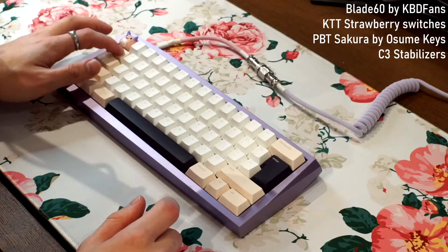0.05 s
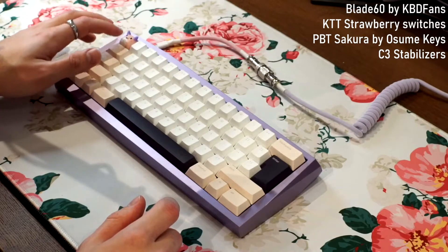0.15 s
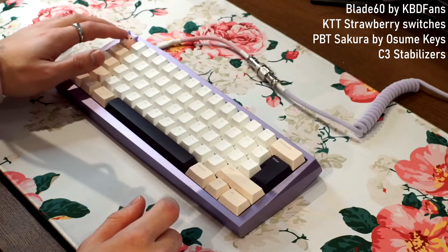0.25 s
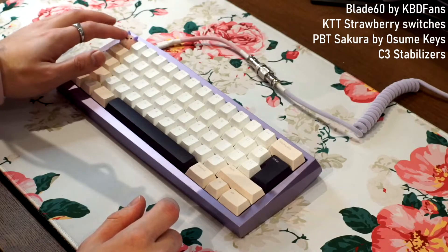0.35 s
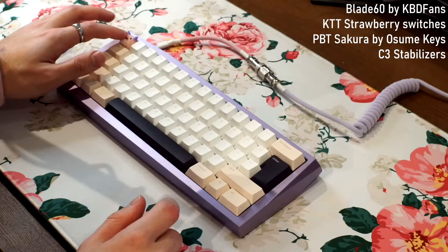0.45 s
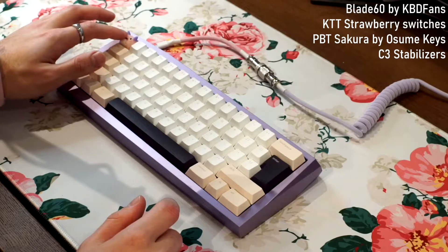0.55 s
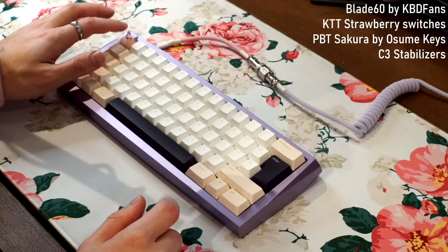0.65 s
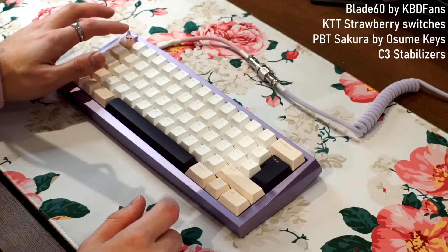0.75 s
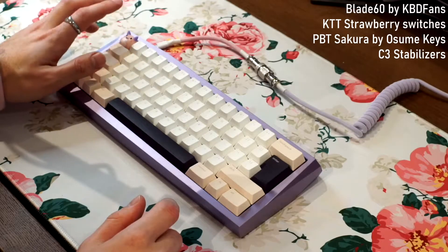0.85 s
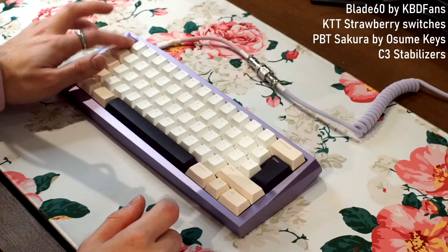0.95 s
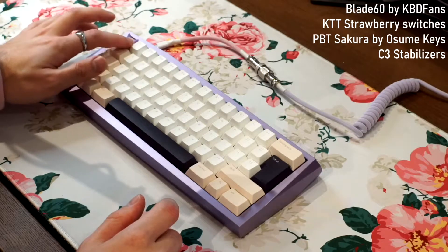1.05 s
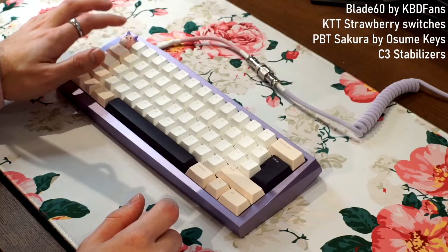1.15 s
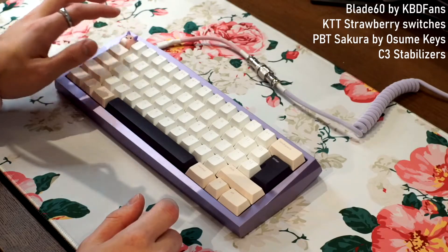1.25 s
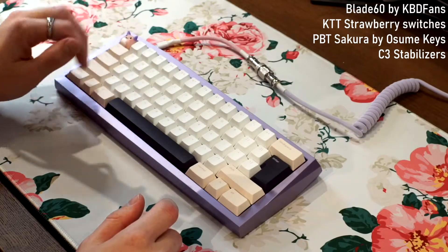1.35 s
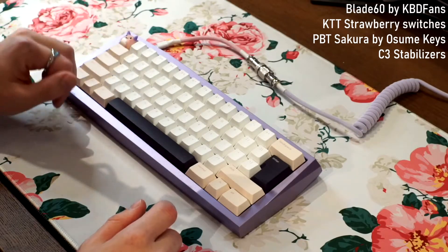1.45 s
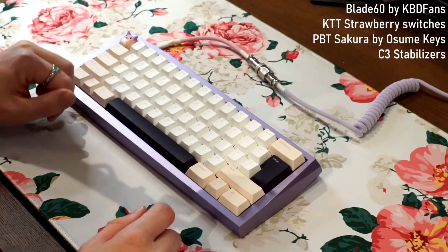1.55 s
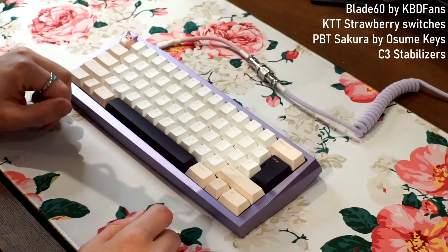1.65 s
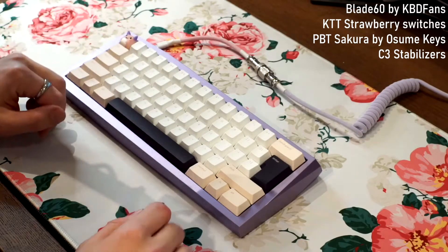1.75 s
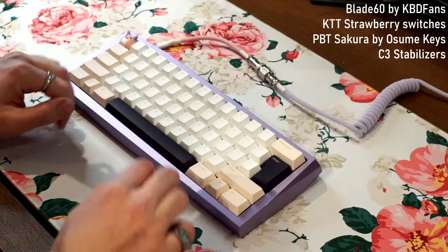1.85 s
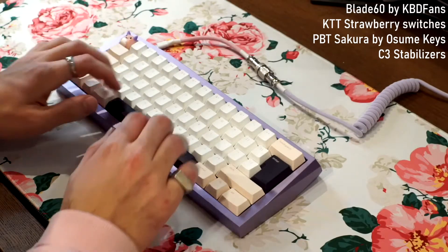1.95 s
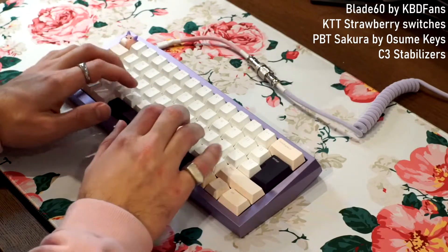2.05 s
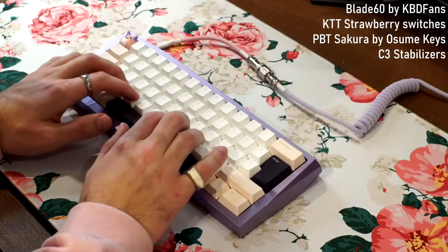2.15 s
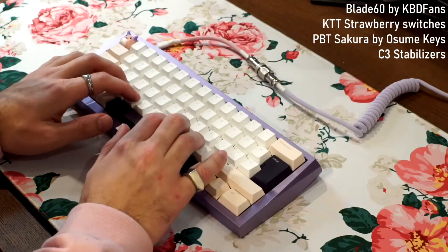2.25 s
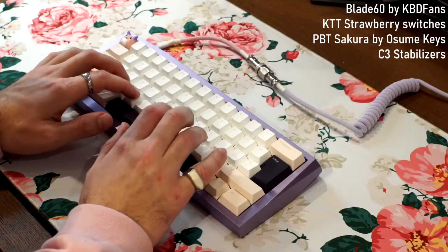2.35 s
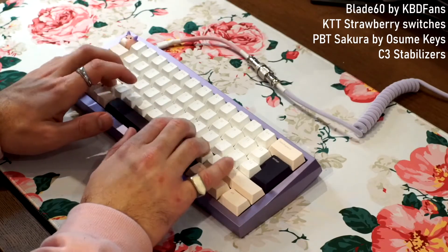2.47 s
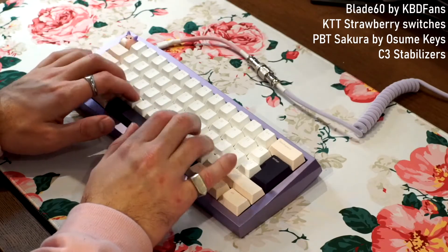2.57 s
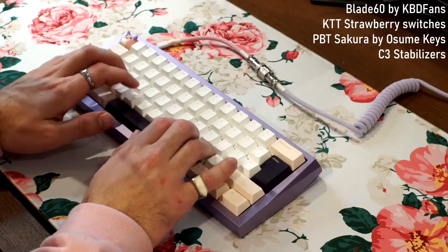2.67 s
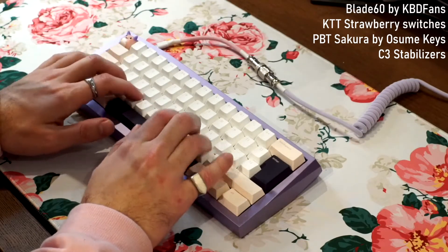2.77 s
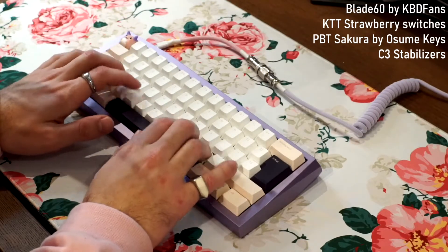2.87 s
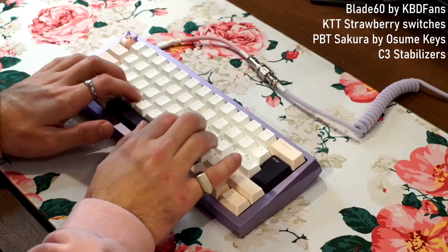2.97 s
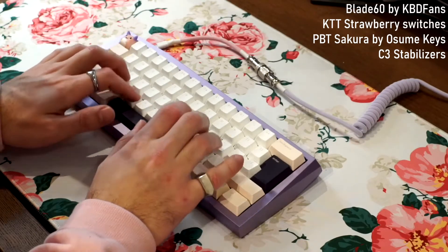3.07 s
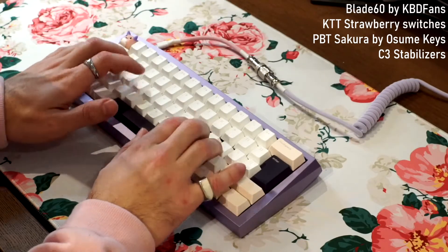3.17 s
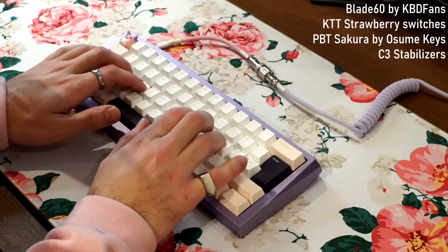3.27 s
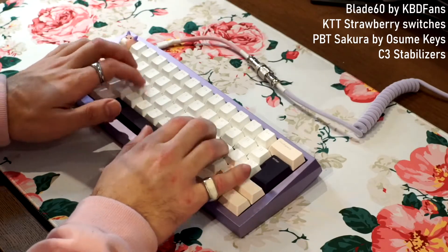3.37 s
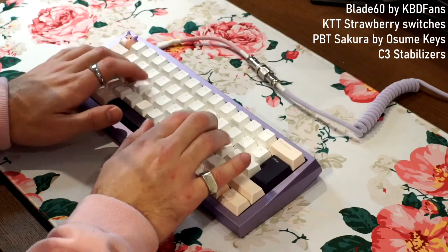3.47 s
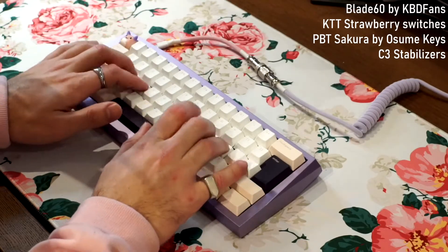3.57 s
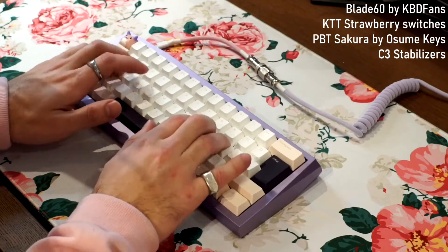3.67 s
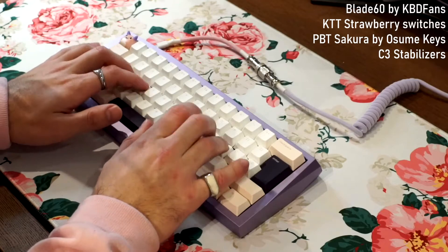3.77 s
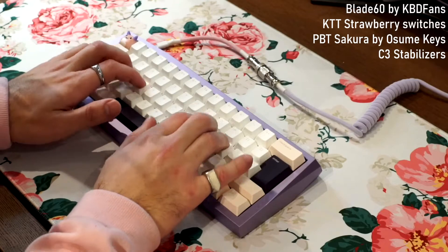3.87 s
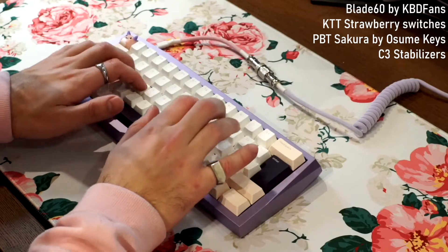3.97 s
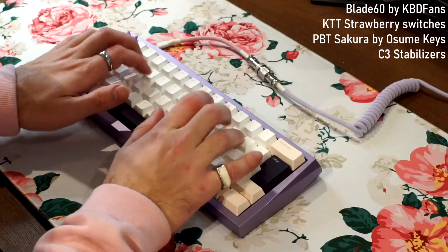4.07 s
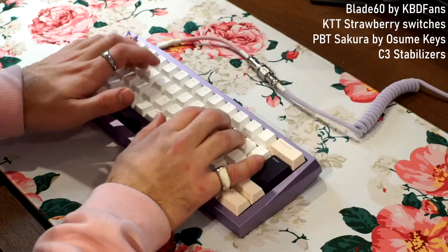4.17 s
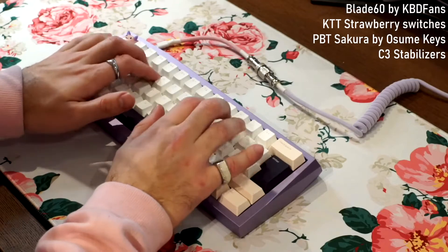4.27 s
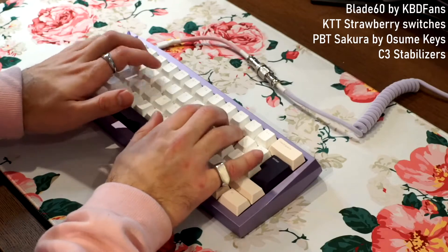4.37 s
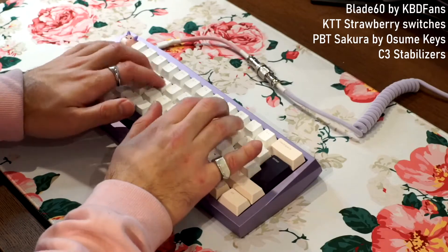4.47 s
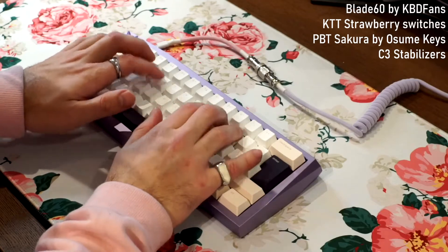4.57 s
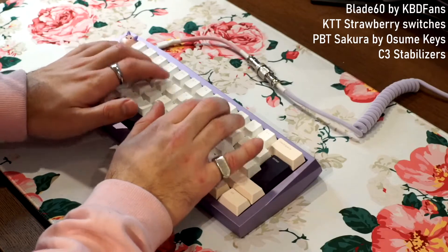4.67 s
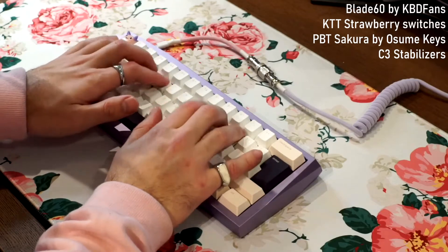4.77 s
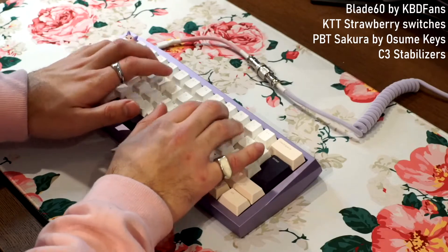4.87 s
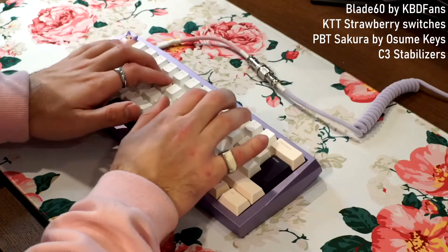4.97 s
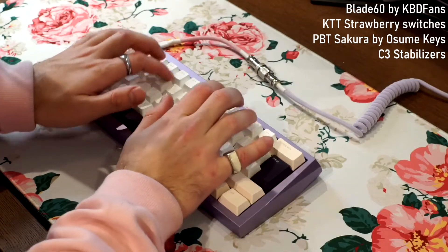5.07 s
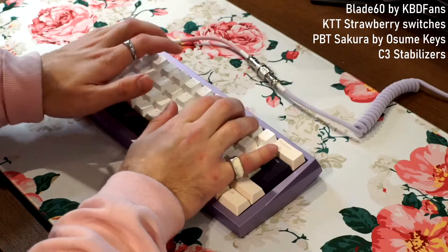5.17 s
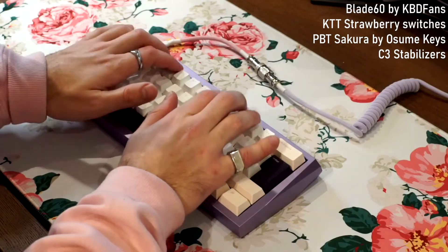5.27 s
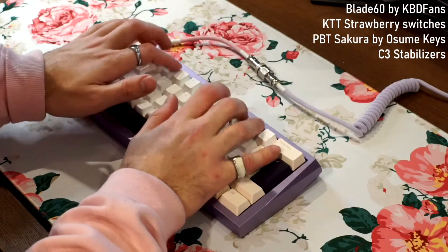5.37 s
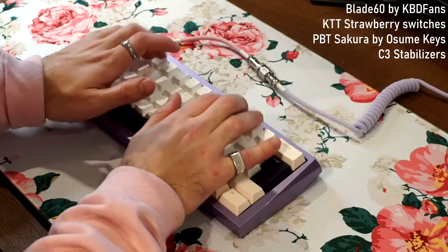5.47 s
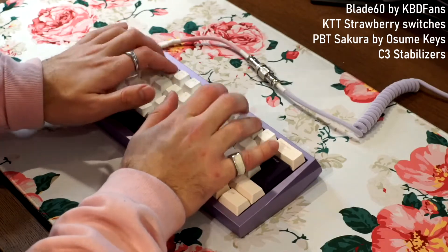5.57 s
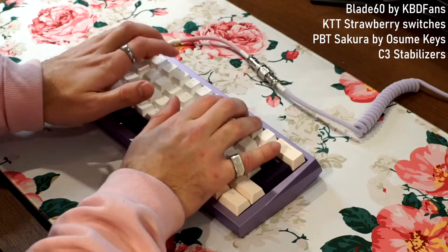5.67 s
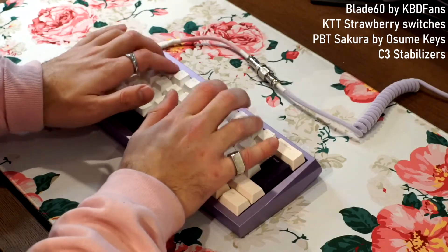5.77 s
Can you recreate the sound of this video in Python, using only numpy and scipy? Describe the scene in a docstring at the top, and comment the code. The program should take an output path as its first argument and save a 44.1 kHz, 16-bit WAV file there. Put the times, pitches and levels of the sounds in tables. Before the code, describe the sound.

Two single deep key presses on a mechanical keyboard, a pause with faint cloth rustle, then fast, dense bursts of clacking typing in a quiet room.

```python
"""Fingers type on a small mechanical keyboard on a cloth desk mat: two single presses, then fast bursts.
Each contact sums damped modes of cap, stem and metal case, with a short noise swelling and fading around it.
Desk and ceiling throw the clacks back and forth; the room adds diffuse tails and steady noise.
Skin and a sleeve brush the mat as grainy noise; a very low hum and a rocking microphone stand are slow sines."""
import sys
import numpy as np
from scipy import signal
from scipy.fft import rfft, irfft, next_fast_len
from scipy.io import wavfile
from scipy.ndimage import uniform_filter1d

SR = 44100
rng = np.random.default_rng(int(sys.argv[2]) if len(sys.argv) > 2 else 0)


def digitize_waveform(pressure):
    """Quantize a signal to 16-bit integers and store it at the path in sys.argv[1].

    Rows of a 2-D input are taken as channels; values are limited to [-1, 1].
    """
    field = np.atleast_2d(pressure).T
    bounded = np.clip(field, -1, 1)
    quanta = np.round(bounded * 32767).astype(np.int16)
    wavfile.write(sys.argv[1], SR, quanta)


def ratio_of_db(decibels):
    """Turn decibels (scalar or array-like) into linear amplitude factors; 0 dB maps to 1."""
    return 10 ** (np.asarray(decibels, float) / 20)


N = 256662


def along(points, hz):
    """Linear interpolation of (f/Hz, value) points on a logarithmic frequency axis."""
    f, v = np.transpose(points)
    return np.interp(np.log(hz + 1), np.log(f + 1), v)


def filtered(x, response):
    """Linear filtering: the spectrum of x times a complex response of frequency."""
    m = next_fast_len(N + SR // 2)
    spectrum = rfft(x, m)
    return irfft(spectrum * response(np.fft.rfftfreq(m, 1 / SR)), m)[..., :N]


def ring(hz, gain, t60, attack, size):
    """Modal superposition: exponentially damped sines, each row summed to one sound of energy 1."""
    t = np.arange(size) / SR
    hz, gain, t60 = (np.asarray(v)[..., None] for v in (hz, gain, t60))
    modes = gain * ratio_of_db(-60 * t / t60) * np.sin(2 * np.pi * hz * t)
    x = modes.sum(-2) * (1 - np.exp(-t / attack))
    return x / np.linalg.norm(x, axis=-1, keepdims=True)


def place(s, db, sounds):
    """Superposition in time: each row laid down at its time and level, some just before the start."""
    at = np.round((s + 1) * SR).astype(int)[:, None] + np.arange(sounds.shape[-1])
    scaled = ratio_of_db(db)[:, None] * sounds
    return np.bincount(at.ravel(), scaled.ravel(), N + 3 * SR)[SR:SR + N]


def struck(modes, scatter_db, detune, attack, size, count, lean_db=0):
    """Modal excitation: each blow drives one set of modes at new strengths, signs and slight detunings."""
    hz, db, t60 = np.transpose(modes)
    chance = rng.standard_normal((count, 3, len(hz)))
    sign = np.sign(chance[:, 2])
    gain = sign * ratio_of_db(db + lean_db + scatter_db * chance[:, 1])
    return ring(hz * (1 + detune * chance[:, 0]), gain, t60, attack, size)


def contacts():
    """Random point process: each clear contact is followed by one faint, randomly timed and pitched tap."""
    # clear contacts of a key stem: t/s, clack level/dB, clack f/Hz,
    # then case ring level/dB and stem level/dB against the clack
    clear = [(-.015,-34.5,1930,15,0),(0.0529,-29.5,2055,19.5,5),(0.5752,-69,1520,18,-9),(0.9232,-22,2500,14,15),(0.9236,0.5,1644,4,-8),(1.0643,-32.5,2700,11,5),
             (2.214,-55,2200,-6,-11),(2.284,-44.5,1690,5.5,-16.5),(2.378,-46.5,2360,-5,1.5),(2.3942,-20.5,2520,-2.5,-5.5),(2.411,-20,2540,-5,-3),
             (2.4334,-15,2040,-8.5,-12),(2.463,-30.5,2280,-5,-5),(2.4981,-12.5,1990,-13,-8.5),(2.5011,-12.5,2500,-5,-4.5),(2.5059,-27,1910,-5,-21),
             (2.5258,-21.5,2080,-6,-11),(2.5301,-9,2500,-11.5,0),(2.5694,-18,2010,-10,-12),(2.5757,-17.5,2370,-9,-9),(2.594,-23.5,2600,1,2),
             (2.6044,-14,2400,-11,-5),(2.6251,-24,2250,-2,1.5),(2.6434,-19.5,2260,-5,0),(2.6682,-17.5,1960,-13,-14),(2.6849,-21,2200,-4.5,-12),
             (2.6949,-14.5,2420,-9,-9),(2.7173,-16,2260,-8,-6.5),(2.73,-16.5,2110,-7,-5),(2.7949,-19.5,2370,-4.5,-4.5),(2.8094,-23,2050,-27,-13),
             (2.8186,-17,2440,-8.5,-7),(2.8293,-20.5,1920,-10,-3),(2.8452,-12.5,2660,-9.5,-1.5),(2.9107,-16,2000,-9,-14),(2.9242,-19.5,2230,0.5,-3.5),
             (2.9279,-18.5,2370,-2,-11),(2.9446,-13.5,2730,-13,-4.5),(2.9581,-20.5,2230,-6,-7.5),(3.0162,-31.5,1960,-18,-24),(3.022,-28,1950,2.5,-5),
             (3.087,-20.5,2600,-7,-2),(3.1002,-31.5,2780,-7,-1),(3.1246,-29,1910,-10,1.5),(3.1621,-37.5,2320,4,7.5),(3.19,-26,2130,-19,-15),
             (3.1924,-30,2000,-10,-25),(3.2052,-16,2270,-8,-5.5),(3.212,-8.5,2280,-24,0),(3.2306,-18,2430,-26,-8),(3.2441,-6,2380,-33,-4.5),
             (3.3007,-31,2350,-1,-13),(3.306,-22.5,2530,1.5,-4),(3.329,-16.5,2600,-8,-6),(3.3371,-18.5,2420,-31,-12),(3.351,-11,2430,-36,-3.5),
             (3.3556,-7.5,2300,-19,-1.5),(3.4072,-16.5,2070,-10,-7.5),(3.4226,-19.5,2610,-6,-14),(3.4256,-23,2150,-25,-6),(3.4445,-10,2670,-12,0.5),
             (3.45,-12,2070,-20,-5.5),(3.488,-6.5,2040,-19,-2),(3.5208,-13,2630,-4,-6),(3.5422,-19,2300,1.5,-1),(3.5476,-22.5,2800,-8,-16),
             (3.584,-5,2300,-26,-2.5),(3.6304,-17,2330,-22,-6.5),(3.6334,-23,1800,-13,-13),(3.6389,-21,2800,-10,-15),(3.648,-21,2430,-13,-13),
             (3.6619,-34,1950,-14,9),(3.671,-11,2300,-7,0.5),(3.6736,-14,2810,-19,-10),(3.7303,-13,2330,-25,-5),(3.739,-18,2740,-4,-7),
             (3.7576,-21,1980,0.5,-14),(3.7681,-19,2620,-6,-4),(3.774,-34,2530,-6,-8),(3.7861,-7,2380,-19,-2),(3.8043,-29,2260,-6,-5),
             (3.8467,-11.5,2110,-9.5,-8),(3.8505,-21,1850,-9,-26),(3.882,-11,2510,-15,-16),(3.8862,-15.5,2370,-21,-3.5),(3.9527,-23,2280,2.5,-4.5),
             (3.9578,-25,2630,-20,-11),(3.96,-24,1850,-7,-19),(4.0042,-23,2380,-11,-1),(4.0421,-31,1870,-1,-2),(4.0634,-32,2260,-16,6),
             (4.077,-15.5,2550,-25,-8),(4.0782,-13.5,2330,-20,-9),(4.0929,-5.5,2500,-18,-1.5),(4.148,-31,2260,-2,2),(4.1575,-6,2440,-23,-8.5),
             (4.1704,-19.5,2240,-2,-25),(4.1819,-6,2580,-20,-5),(4.2062,-19.5,2530,-19,-6),(4.2325,-17.5,2430,-5,-7),(4.236,-24,1860,-14,-15),
             (4.2423,-17,2340,-11,-7),(4.2796,-36,2600,-2,-4),(4.2888,-20.5,2640,-7,-3),(4.2943,-19.5,2460,-20,-16),(4.3003,-7.5,2430,-30,-7),
             (4.3203,-8,2400,-29,-3),(4.3819,-20.5,2500,-8,-8),(4.391,-17.5,2470,-15,-7),(4.4063,-11.5,2710,-15,-7.5),(4.408,-21,2740,-2,-13),
             (4.4244,-6,2550,-22,-1.5),(4.4632,-37,2350,6,-11),(4.4784,-12,2630,-19,-8.5),(4.499,-19.5,2460,-9,-7),(4.5175,-13.5,2620,-27,-10),
             (4.5321,-19,2640,-13,-4),(4.5553,-13,2700,-30,-7),(4.599,-10.5,2670,-24,-11),(4.6035,-12,2480,-29,-12),(4.608,-15,2460,-10,-9),
             (4.629,-6.5,2260,-15,-1.5),(4.638,-17,2550,-8,-9),(4.655,-51,2480,-2,17),(4.6618,-5.5,2530,-18,-3),(4.706,-35,2620,2,5),
             (4.7175,-13,2360,-23,-7.5),(4.727,-9,2480,-27,-6.5),(4.7313,-12,2460,-34,-14),(4.7637,-13,2700,-38,-6.5),(4.7711,-20,2670,-12,-4),
             (4.8341,-19,2370,-6,-7.5),(4.8428,-23.5,2400,-1.5,-4.5),(4.868,-23,2650,-27,-12),(4.881,-19,2550,-20,-10.5),(4.9495,-33,3040,-17,-14),
             (4.979,-25,2430,-3,-12),(4.9817,-37,1850,-19,-25),(5.0345,-26.5,2710,-5.5,-6.5),(5.1008,-39,2840,-8,-3),(5.1221,-15.5,2170,-8,-9),
             (5.1312,-23,2520,6.5,-20),(5.1344,-11.5,2400,-18,-5),(5.1516,-33,2040,3,-1),(5.1716,-20,2380,-1,-12),(5.173,-25,1770,-18,-13),
             (5.1969,-39,2680,2,6),(5.205,-15.5,2520,-2,-12),(5.225,-20,2010,3,-9),(5.2404,-21,2400,2,-5),(5.3026,-18,2040,-3,-11.5),
             (5.3206,-14,2320,-6,-5),(5.3372,-13.5,2520,-3.5,-6),(5.3528,-23,2340,3.5,-9),(5.399,-15.5,2600,-4,-5.5),(5.423,-18.5,2280,-1,-7),
             (5.434,-14.5,2050,-9,-12),(5.4399,-21,2140,2,-7),(5.4522,-20,1720,10.5,-9),(5.4564,-7,2120,-13,-3.5),(5.485,-15,2360,-4,-7),
             (5.5191,-15,2640,-4,-3.5),(5.546,-23,2220,9.5,-5),(5.56,-15,2280,-1,-13),(5.5799,-31,2690,5,-16),(5.603,-17.5,2130,-5,-11),
             (5.6086,-14,2530,-3,-2),(5.6485,-15.5,2400,-0.5,-10.5),(5.6514,-26,1840,-7,-24),(5.6623,-21,2020,-12,-17),(5.6642,-23,1960,-3,-12),
             (5.6868,-21,2230,1,-7),(5.6952,-8,2400,-6,-9),(5.7287,-9.5,2230,-4,-2),(5.7668,-26.5,2120,9.5,-2),(5.7708,-27,2280,-7,-11),
             (5.779,-17.5,2170,3.5,-11),(5.7907,-12.5,2500,-12,-8.5),(5.8128,-9.5,2300,-4,3)]
    # scatter of the taps: clack level/dB, clack f/Hz, case level/dB, stem level/dB
    tap_scatter = 4.5, 210, 4.2, 5.2
    average_tap = [-35, 2280, -8, -11.5]  # the same columns, after a 0 dB blow
    db_per_blow_db = .55
    s, db = np.transpose(clear)[:2]
    taps = rng.standard_normal((len(s), 4)) * tap_scatter + average_tap
    tap_s = s + rng.uniform(.012, .05, len(s))
    tap_db = taps[:, 0] + db_per_blow_db * db
    taps = np.column_stack([tap_s, tap_db, taps[:, 1:]])
    return np.vstack([clear, taps]).T


def keys(s, db, hz, case_db, stem_db):
    """Impact excitation of modes: clack of the cap, stem, tick of its thin walls and ring of the case."""
    # plate and case modes: f/Hz, level/dB, t60/s
    case_modes = [(430, -20, .04), (610, -15, .045), (775, -11, .045), (1072, 0, .045), (1265, -7, .025),
                  (1652, 0, .035), (1878, 1, .065)]
    # stem and switch housing modes: f/Hz, level/dB, t60/s
    stem_modes = [(3400, -3, .006), (4300, -1, .006), (5000, 0, .006), (5600, -1, .006), (6050, -5, .007)]
    # modes of the thin cap walls: f/Hz, level/dB, t60/s
    tick_modes = [(7700, -2, .005), (8700, -1, .005), (11100, -1, .005), (12100, -3, .004),
                  (13400, -6, .004), (14400, -6, .004), (15200, -8, .004)]
    count = len(s)

    trio_hz = hz[:, None] * [.8, 1, 1.24] * (1 + .04 * rng.standard_normal((count, 3)))
    trio_gain = ratio_of_db([-5, 0, -5]) * [-1, 1, -1]
    clack = ring(trio_hz, trio_gain, [.006, .0065, .005], .0003, size=900)

    # an upper plate mode rings most when the clack lies near its pitch
    plate_hz = np.transpose(case_modes)[0]
    lean_db = -55 * np.abs(np.log2(hz[:, None] / plate_hz)) * (plate_hz > 1500)
    case = struck(case_modes, 3, .008, .0012, size=4000, count=count, lean_db=lean_db)
    stem = struck(stem_modes, 3, .03, .0002, size=700, count=count)
    tick = struck(tick_modes, 4, .04, .0001, size=500, count=count)

    # against the blow: hard blows are brighter, the tick swings wider than the stem,
    # and caps that clack higher tick more (6 dB per octave)
    tick_db = -7.5 + 0.11 * db + 1.15 * stem_db + 6 * np.log2(hz / 2300)
    board = place(s, db, clack) + place(s, db + case_db, case)
    board = board + place(s, db + stem_db, stem) + place(s, db + tick_db, tick)
    # so small a body radiates little bass: third-order roll-off
    return filtered(board, lambda f: (1j * f / (1j * f + 500)) ** 3)


def noise_swell(s, db):
    """Enveloped random noise: a short noise swells before each blow and fades after it."""
    t = np.arange(3000) / SR - .008  # the blow falls at t = 0
    shape = np.where(t < 0, ratio_of_db(-9.5 + 60 * t / 0.0089), ratio_of_db(-60 * t / 0.041))
    noise = shape * rng.standard_normal((len(s), len(t)))
    # hard blows add less than their share
    swells = place(s + t[0], 0.63 * db - 33.5, noise)
    colour = [(300, -26.5), (1200, 12.5), (6000, -10.5), (7000, -10.5), (16000, -25.5)]
    return filtered(swells, lambda f: ratio_of_db(along(colour, f)))


def desk(s, db):
    """Modal impulse response: every blow thumps the low modes of the desk top."""
    # desk top modes: f/Hz, level/dB, t60/s
    desk_modes = [(51.5, 0.5, 0.72), (82.7, -7, 0.45), (134, -7.5, 0.16), (328, -1, 0.044)]
    hz, mode_db, t60 = np.transpose(desk_modes)
    blows = place(s, db - 19.5, rng.standard_normal((len(s), 1)))
    thump = ring(hz, ratio_of_db(mode_db), t60, .004, size=SR // 2)
    return signal.fftconvolve(blows, thump)[:N]


def slow_sine(s, hz, db):
    """Frequency and amplitude modulation: a sine's phase integrates a pitch curve, at an rms level curve."""
    t = np.arange(N) / SR
    phase = 2 * np.pi * np.cumsum(np.interp(t, s, hz)) / SR
    return np.sqrt(2) * ratio_of_db(np.interp(t, s, db)) * np.sin(phase)


def low_hum():
    """Amplitude modulation: a very low hum at one pitch rises and falls along a level curve."""
    # hum: t/s, rms level/dB
    levels = [(0, -48), (.91, -58), (.97, -46), (2.2, -61.5), (2.48, -46), (2.8, -46.5), (2.87, -42.5),
              (3.16, -51), (3.29, -42.5), (3.45, -48), (3.65, -42), (3.73, -58), (3.82, -44.5), (4.12, -51),
              (4.68, -41.5), (5.46, -43), (5.59, -61), (5.66, -51), (5.82, -50)]
    s, db = np.transpose(levels)
    return slow_sine(s, np.full(len(s), 28.5), db)


def rock():
    """Infrasonic oscillation: the microphone stand rocks at a slowly changing pitch and level."""
    # stand motion: t/s, f/Hz, rms level/dB
    stand = [(0, 7.4, -50), (0.499, 7.42, -45), (1.301, 7.42, -62.5), (2.01, 7.4, -55), (2.6, 8.8, -57),
             (2.8, 8.8, -45), (3.97, 8.66, -48.5), (5.09, 8.8, -58.5), (5.32, 7.6, -48), (5.82, 6, -54.5)]
    return slow_sine(*np.transpose(stand))


def ceiling(x):
    """Flutter echo: two round trips between desk and ceiling, the second weaker and duller."""
    round_trip_s, loss_db, dull_hz = .0106, -20, 9000

    def trip(f):
        delay = np.exp(-2j * np.pi * f * round_trip_s)
        return ratio_of_db(loss_db) * delay / (1 + 1j * (f / dull_hz) ** 2)

    return filtered(x, lambda f: trip(f) + ratio_of_db(8) * trip(f) ** 2)


def room(x):
    """Diffuse reverberation: three noise tails take turns so that like blows decay differently."""
    # room decay: f/Hz, t60/s
    decay = [(300, .3), (1500, .3), (5000, .25), (14000, .17)]
    hz, t, z = signal.stft(rng.standard_normal((3, SR // 2)), SR, nperseg=256)
    decayed = z * ratio_of_db(-60 * t / along(decay, hz)[:, None])
    tails = signal.istft(decayed, SR, nperseg=256)[1]
    # each tail takes 900 samples of the input in turn
    turn = np.arange(N) // 900 % 3 == np.arange(3)[:, None]
    wet = signal.fftconvolve(x * turn, tails / np.linalg.norm(tails[0]), axes=1).sum(0)
    return np.pad(wet, (150, 0))[:N]  # the tails set in 150 samples late


def air():
    """Stationary random noise: steady room noise, Gaussian noise shaped in frequency."""
    # room noise spectrum: f/Hz, relative density level/dB
    spectrum = [(20, -7.5), (60, -6.5), (140, -3), (245, -4), (290, -9.5), (500, -15.5), (1100, -16.5),
                (2000, -27.5), (10000, -34.5), (12500, -34.5), (13500, -43), (16000, -46.5)]
    x = filtered(rng.standard_normal(N), lambda f: ratio_of_db(along(spectrum, f)))
    return ratio_of_db(-73.5) * x / x.std()


def sleeve():
    """Friction noise: cloth and skin brush on cloth as soft noise with random grain."""
    # a sleeve drawn over the mat: t/s, level/dB
    drawn = [(1.15, -86.5), (1.4, -86.5), (1.51, -78.5), (1.83, -81.5), (2.1, -83.5), (2.2, -95.5)]
    # skin flicks the cloth: t/s, peak level/dB
    flicks = [(1.328, -81), (1.508, -87), (1.689, -82), (1.85, -87.5), (2.1, -91)]
    rise_db_per_s, fall_db_per_s = 200, 150.5
    t = np.arange(N) / SR
    cloth = ratio_of_db(np.interp(t, *np.transpose(drawn), left=-150, right=-150))
    skin = 0
    for s, db in flicks:
        skin = skin + ratio_of_db(db - np.maximum(rise_db_per_s * (s - t), fall_db_per_s * (t - s)))
    cloth_colour = [(300, -14), (900, 2.0), (2200, -4.5), (5000, -11.0), (9000, -33)]
    skin_colour = [(3000, -23.5), (7000, -1), (12000, -0.5), (15500, -8)]
    out = 0
    for level, colour in ((cloth, cloth_colour), (skin, skin_colour)):
        smooth = uniform_filter1d(rng.standard_normal(N), size=200) * np.sqrt(200)
        grain = ratio_of_db(2 * smooth)  # 2 dB rms
        x = filtered(grain * rng.standard_normal(N), lambda f: ratio_of_db(along(colour, f)))
        out = out + level * x / x.std()
    return out


def scene():
    """Superposition of sources: the keyboard in its room, desk thumps, low sines, brushing and room noise."""
    s, db, *colour = contacts()
    board = keys(s, db, *colour) + noise_swell(s, db)
    low = desk(s, db) + low_hum() + rock()
    reflected = ceiling(board) + ratio_of_db(-25) * room(board)
    return (board + reflected + low + sleeve() + air())[None]


def roll_off(x):
    """The treble ends steeply here."""
    return signal.sosfilt(signal.butter(12, 16830, fs=SR, output="sos"), x)


def record(dry):
    """Low-pass response: the microphone rolls off steeply above 15.7 kHz."""
    finished = filtered(dry, lambda f: 1 / np.sqrt(1 + (f / 15700) ** 30))
    return roll_off(finished)


dry = scene()
out = record(dry)
digitize_waveform(out)
```